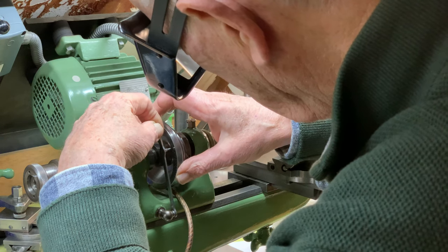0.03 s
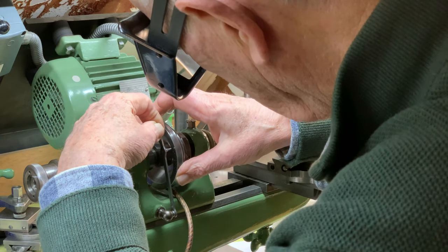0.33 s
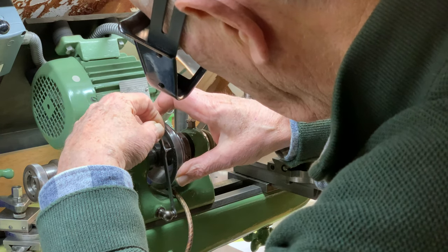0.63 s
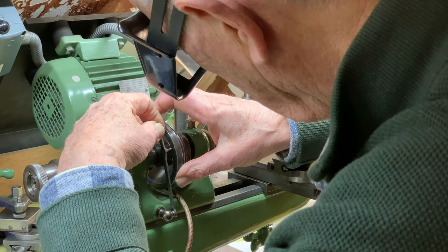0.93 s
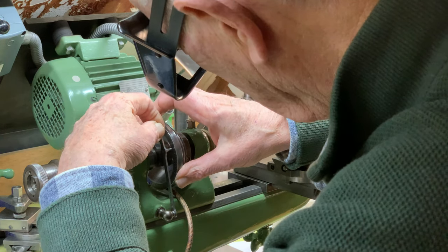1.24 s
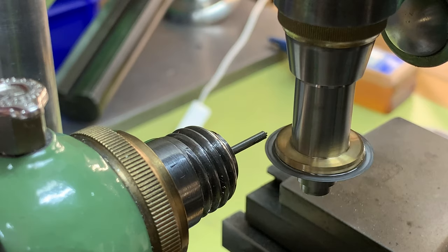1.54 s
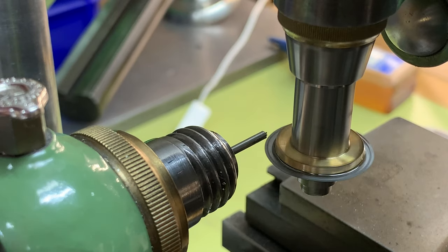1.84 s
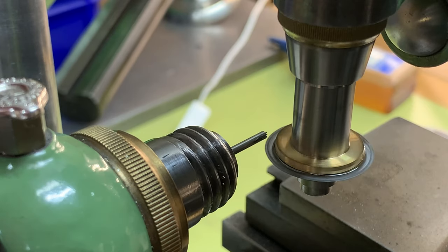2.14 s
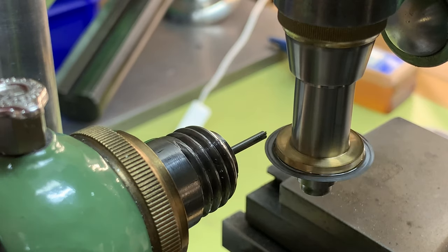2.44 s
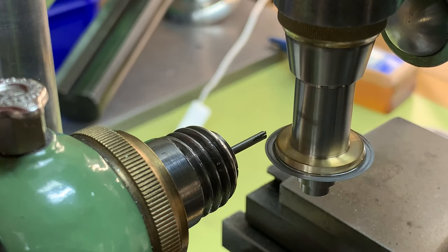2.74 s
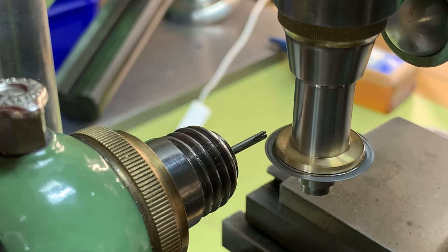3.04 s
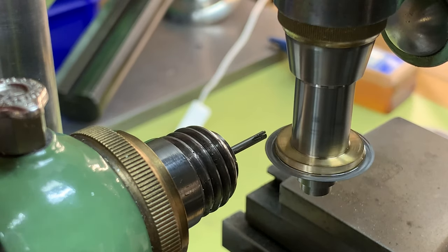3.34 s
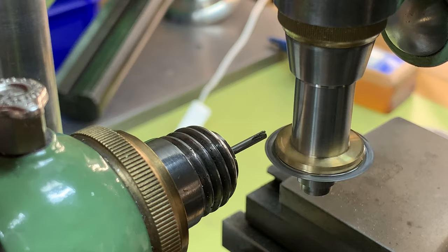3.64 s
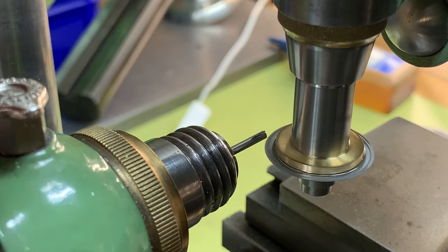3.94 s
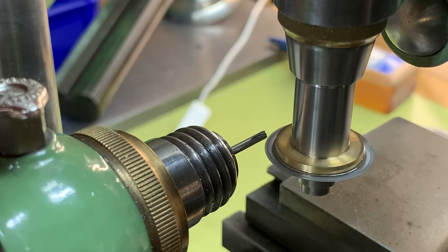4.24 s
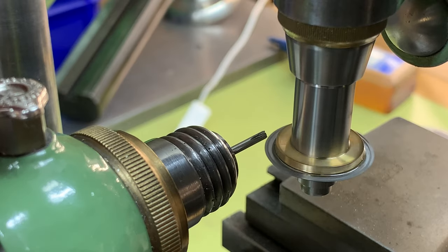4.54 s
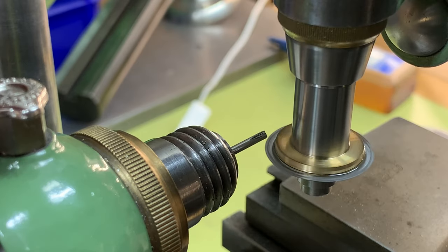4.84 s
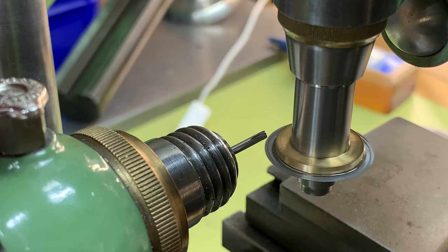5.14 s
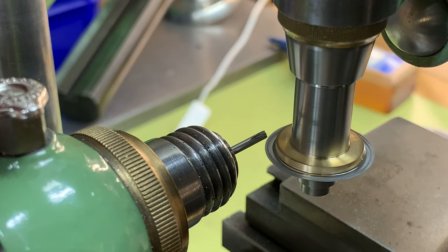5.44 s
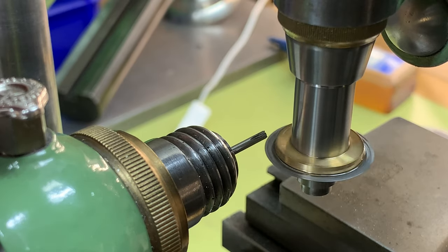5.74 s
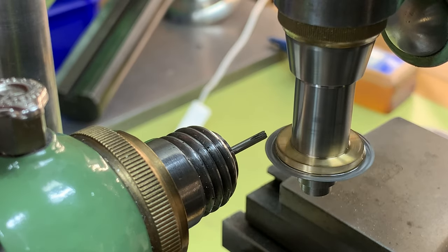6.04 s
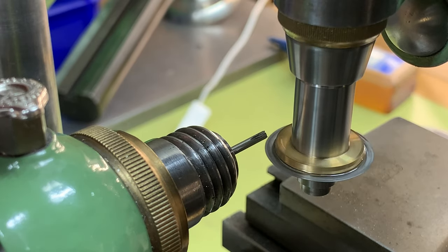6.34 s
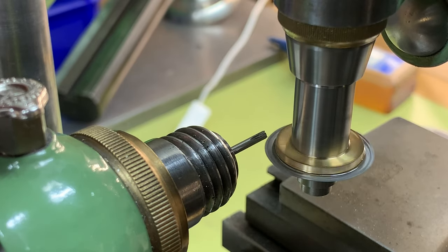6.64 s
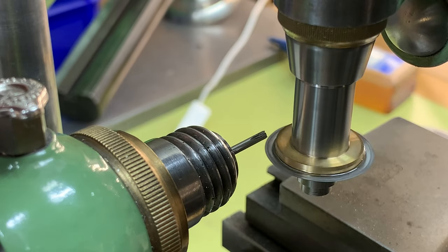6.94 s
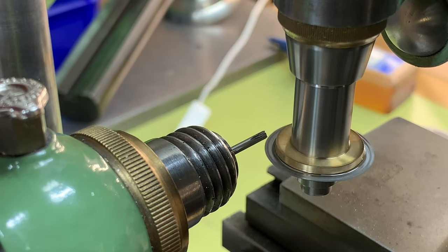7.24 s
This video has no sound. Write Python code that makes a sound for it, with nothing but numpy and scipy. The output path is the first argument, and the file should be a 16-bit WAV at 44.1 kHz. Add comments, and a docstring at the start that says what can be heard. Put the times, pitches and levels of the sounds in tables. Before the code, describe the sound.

A small lathe is already running at the start, close by on a workshop bench with only very short reflections. Bright steel double clacks repeat about ten times a second, with a fast ticking rattle and a few stray clacks between them. A high metallic ringing swells at nearly the same rate. Underneath are a steady motor hum, the drone of the frame, a smooth bearing hiss and soft belt thumps. For the first 1.2 seconds the sound is louder and fuller in the middle range. It then drops out for a split second and returns at about 1.3 seconds, quieter and thinner, with the same rhythm and a faint high whine. Slight brushing scrapes blend into the rattle at around 3.2, 5.3 and 5.7 seconds. The machine keeps its even pace to the end at about 7.5 seconds.

```python
"""Bright steel clacks and a fast ticking rattle from a small lathe running on a workshop bench, close by. Its
drive turns ten times a second: loose parts tick at fixed places round the turn and clack twice at its tight
spot, with stray clacks between. The spindle sings in swells, the belt thumps, the frame drones and the motor
hums. The scene changes from beside the headstock to the cutter, with a brief near-silence between."""
import sys
import numpy as np
from scipy import signal
from scipy.fft import rfft, irfft
from scipy.io import wavfile

SR = 44100
rng = np.random.default_rng(int(sys.argv[2]) if len(sys.argv) > 2 else 0)


def to_wav(sig):
    """Store sig (one row per channel, or 1-D mono) as 16-bit WAV at the path in sys.argv[1].

    Samples outside -1..1 are clipped; the rate is SR.
    """
    pcm = np.clip(np.atleast_2d(sig), -1, 1) * 32767
    pcm = np.round(pcm).astype(np.int16)
    wavfile.write(sys.argv[1], SR, pcm.T)  # frames by channels


N = 329868
TIME, HZ = np.arange(N) / SR, np.fft.rfftfreq(N, 1 / SR)
TURN_HZ = 10.0066
CHANGE_S = 1.27  # the scene changes to the cutter

# one row per turn: (time [s], first blow [dB], second blow [dB], its chink [dB], belt thump [dB])
CLACKS = [(0.011, -34, -26, -38.0, -68.0), (0.11, -23, -32, -39.0, -61.0), (0.2054, -29.5, -33.0, -31, -53),
          (0.311, -27, -32, -32, -37.5), (0.4097, -29, -33.0, -35.0, -38.5), (0.51, -24.5, -30, -35, -42),
          (0.6098, -25.5, -29, -33.5, -42), (0.7126, -27, -25, -39, -65.0),
          (0.8111, -22.5, -29, -35, -60.0), (0.909, -23.0, -23.5, -30, -43.5),
          (1.006, -29, -28.0, -32, -47.0), (1.1125, -26, -25, -30.0, -52.0),
          (1.21, -22.5, -32, -34.5, -65.0), (1.3472, -22.5, -31, -28, -60),
          (1.4503, -26.5, -30, -31.0, -35.5), (1.549, -28, -39, -26.5, -54),
          (1.6483, -28.5, -39.0, -28.5, -40.5), (1.7504, -22.5, -31, -28.5, -44),
          (1.8494, -25.5, -35, -29, -51), (1.951, -28, -28, -28.5, -46), (2.0483, -30, -35.0, -28, -64),
          (2.148, -31.0, -34.0, -36, -50), (2.25, -26, -34.0, -26.5, -43), (2.349, -24.0, -32.0, -32, -62),
          (2.448, -26, -42, -30, -64.0), (2.5505, -25.0, -41, -34, -47), (2.651, -28, -33, -43.5, -41),
          (2.749, -25.5, -28, -35.5, -43), (2.849, -23.5, -31, -28, -44.0),
          (2.946, -30.0, -27.5, -31.5, -42), (3.0485, -24.5, -32, -33, -39.5),
          (3.147, -26, -25, -30.5, -48.0), (3.2445, -48, -28, -30.5, -45),
          (3.346, -23.5, -29.0, -30, -54.0), (3.447, -26, -31, -29.5, -38.0),
          (3.5472, -22.5, -37, -35, -59), (3.645, -34.0, -41, -31, -57.0), (3.745, -21.5, -30, -39.0, -67),
          (3.8442, -26, -32, -31, -58), (3.9464, -27, -37, -32, -38), (4.046, -27, -29.0, -27.5, -57),
          (4.1442, -32.0, -26, -30, -39), (4.2483, -22.0, -32.0, -31, -47),
          (4.3478, -23.5, -34.0, -28.5, -53), (4.4482, -25.5, -30, -35.0, -59),
          (4.5487, -26.5, -36, -39, -67), (4.648, -31, -32, -45, -62), (4.7483, -25.0, -28, -29.5, -42),
          (4.8468, -22, -33, -29.5, -66.0), (4.948, -24, -40, -32, -63), (5.0484, -22.5, -28, -38, -53),
          (5.148, -24.5, -29.0, -33.0, -39), (5.246, -23, -28.0, -38.0, -43),
          (5.3469, -23.0, -34, -27, -44), (5.4473, -24.5, -26.5, -37, -47), (5.548, -26.0, -29, -36, -41.0),
          (5.648, -23.5, -26, -37, -50), (5.746, -38.0, -28.5, -30.5, -45), (5.844, -21, -32, -32, -37.5),
          (5.948, -26.5, -42.0, -40, -44), (6.0459, -22.5, -34, -34, -60), (6.1432, -35, -26, -39.5, -43),
          (6.2454, -23, -32, -38, -51), (6.3478, -22.5, -30, -28.5, -44), (6.445, -21.5, -41.0, -31, -41.0),
          (6.5465, -27, -31, -31, -45.0), (6.6457, -31, -32, -32.5, -38.0), (6.746, -22.0, -27, -33.5, -41),
          (6.847, -23, -42.0, -33, -45), (6.947, -25.0, -37, -38, -53.0), (7.048, -26.5, -29, -36, -56),
          (7.1463, -29.5, -35.0, -42, -50.0), (7.247, -26.5, -25.0, -32, -39.0),
          (7.3456, -21.5, -37.5, -37.0, -62), (7.4454, -39.0, -29, -32, -42.5)]
# where the loose parts touch: (place [turns], singing tick [dB], bright snap [dB], deep ring [dB])
TICKS = [(0.036, -44.0, -31.5, -38.0), (0.134, -36.5, -33.5, -39.0), (0.166, -36.0, -33.0, -39.0),
         (0.207, -35.0, -33.5, -40.5), (0.246, -37.0, -37.0, -43.5), (0.292, -37.5, -38.5, -47.0),
         (0.321, -41.5, -41.5, -49.5), (0.415, -38.5, -43.0, -49.0), (0.491, -36.0, -37.5, -45.0),
         (0.53, -36.0, -42.0, -47.0), (0.574, -38.5, -44.0, -51.5), (0.613, -33.5, -44.5, -48.5),
         (0.652, -37.0, -41.5, -47.5), (0.698, -34.5, -37.5, -44.5), (0.738, -36.0, -38.5, -45.0),
         (0.78, -36.0, -39.5, -44.0), (0.824, -35.5, -36.0, -42.5), (0.87, -38.0, -34.5, -45.5),
         (0.911, -39.5, -33.0, -43.5), (0.956, -39.5, -30.0, -40.0)]
# how hard the steel parts run against each other: (time [s], level [dB])
EFFORT = [(0, 0), (.7, 0.5), (1.2, 1), (1.4, 2), (2, 1.4), (3.2, -0.5), (4, 1), (4.9, 1), (5.4, 0.5),
          (6.2, 1), (7.48, 1)]
# the bright snap and the deep ring of a steel contact: (frequency [Hz], level [dB])
CLACK_BRIGHT = [(3300, -19.5), (4000, -11.5), (4900, -11.5), (5600, -8), (6900, -7), (8000, -0.5),
                (8800, 3), (10000, -4.5), (11200, -8), (12400, -16), (15800, -17.5)]
CLACK_DEEP = [(300, -37), (800, -33), (1400, -9), (2000, -7.5), (2300, -3.5), (2600, 1.5), (3050, -1.5),
              (3350, -3), (4300, -20.5), (5500, -34.5)]
# resonances of steel and frame, hollows where negative: (frequency [Hz], width [Hz], lift [dB])
STEEL_MODES = [(1950, 250, 2), (2270, 90, -3), (2450, 90, 5.5), (2560, 70, -4.5), (2700, 60, 6.5),
               (2850, 50, 3), (2930, 50, -4), (3000, 60, 6), (3070, 70, 6), (3390, 140, -4.5),
               (3720, 130, 3), (3870, 80, -3), (4020, 200, 2.5), (4370, 120, 3), (4750, 500, -2.5),
               (5280, 130, 3), (5645, 60, 3.5), (5745, 60, 4), (5960, 120, 2), (6280, 100, 2),
               (6500, 50, 5), (6570, 40, 4.5), (6700, 70, -2), (6950, 70, 2.5), (7220, 130, 5),
               (7460, 200, 5.5), (7680, 140, -4), (8040, 400, 3.5), (8760, 190, 3.5), (9030, 130, -3),
               (9180, 130, 3.5), (9930, 150, 5), (10500, 250, 2), (11230, 150, 2), (12750, 200, 4)]
FRAME_MODES = [(203, 18, 7), (268, 22, -4), (361, 25, 4), (432, 30, 5), (495, 25, 4), (566, 22, -6),
               (588, 12, -4), (633, 8, -3), (603, 14, 2), (621, 16, 10), (645, 16, 9), (661, 12, 3),
               (678, 12, 6), (695, 16, -4), (735, 20, 4), (760, 26, -7), (798, 12, 4), (822, 22, 5),
               (850, 20, -3), (910, 40, 2), (955, 20, -3), (996, 22, 5), (1038, 30, -6), (1095, 14, 4),
               (1125, 35, 4), (1162, 25, 5), (1220, 70, -4), (1400, 40, 2), (1610, 50, 2)]
# stereo image: (frequency [Hz], likeness [0-1], lag of the left [ms], left minus right [dB])
STEREO = [(30, 0.54, 0, -4), (99, 0.93, -0.027, -1.5), (199, 0.88, -0.11, 0), (457, 0.95, -0.25, -1),
          (700, 0.8, -0.28, 1.5), (1275, 0.52, -0.1, 1), (2480, 0.18, .28, -0.5), (2990, 0.84, 0.23, -2),
          (4400, 0.8, 0.27, 1), (5640, 0.9, 0.22, -6), (5680, 0.76, 0.19, -5), (7450, 0.47, 0.17, 1),
          (8050, 0.98, 0.283, -2), (10300, 0.93, 0.2978, 0.5), (15000, 1, 0.2984, 0)]


def clacks(second_times, bright_db=1.5, deep_db=1.5, after_db=-13):
    """Hard steel contacts: a bright snap, a deeper ring, and a faint after-ring of the spindle."""
    # what sings on after a clack: (frequency [Hz], level [dB])
    after_ring = [(2000, -22), (2900, -19), (3400, -10), (5000, -29.5), (5650, -11), (6800, -33),
                  (7400, -3), (8050, -11), (8800, 0.5), (10000, -4.5), (12000, -23)]
    times, snap_levels, deep_levels = contacts(second_times)
    blows = strikes(times, gain_of(snap_levels) ** 2)
    snap = die_away(blows, rise_s=0.0004, decay_s=0.0019)
    deep = die_away(strikes(times, gain_of(deep_levels) ** 2), rise_s=0.00036, decay_s=0.002)
    after = die_away(blows, rise_s=0.0016, decay_s=0.0089)
    return (gain_of(bright_db) * ring(snap, CLACK_BRIGHT, STEEL_MODES)
            + gain_of(deep_db) * ring(deep, CLACK_DEEP, STEEL_MODES)
            + gain_of(after_db) * ring(after, after_ring, STEEL_MODES))


def contacts(second_times, first_ring_db=-10, second_ring_db=-9):
    """Times, snap levels and deep-ring levels of all clacks: a double blow each turn, and the strays."""
    times, first, second, chink, _ = np.transpose(CLACKS)
    first_blows = [times, first, first + first_ring_db]
    second_blows = [second_times, second, chink + second_ring_db]
    return np.hstack([first_blows, second_blows, stray_clacks()])


def stray_clacks(cycle_s=25 / TURN_HZ):
    """Clacks outside the double blow; those heard at the cutter come back every cycle."""
    # first appearances: (time [s], snap [dB], deep ring [dB])
    strays = [(.1639, -29.5, -32.5), (.2224, -26.5, -47), (.58, -33, -43), (.655, -27.5, -33),
              (.9976, -32, -36), (2.7989, -27, -34), (2.8034, -36, -55), (2.8645, -26.5, -46),
              (3.2199, -31, -52), (3.291, -28, -44), (3.429, -28, -33.5), (3.6365, -49, -36),
              (3.6402, -30, -39), (3.6446, -47, -50)]
    return np.transpose([(at, *levels) for start, *levels in strays
                         for at in np.arange(start, CHANGE_S if start < CHANGE_S else N / SR, cycle_s)])


def chinks(second_times, level_db=20.5):
    """The second blow of each turn lands cleanly and rings the same metallic chink."""
    # one clean strike on steel: (frequency [Hz], level [dB])
    spectrum = [(1200, -22), (2100, -16), (2500, -1), (3000, 4.5), (3400, -9.5), (4600, -15), (5500, -15),
                (7200, -25), (8000, -16), (8600, -3), (9200, -10), (10500, -11), (12000, -27), (15800, -32)]
    force = rfft(strikes(second_times, gain_of(np.transpose(CLACKS)[3] + level_db)))
    return body(force, force, spectrum, STEEL_MODES)


def rattle(sing_db=1.0, snap_db=-3.0, deep_db=-1, uneven_db=2.1, scatter_s=0.00049):
    """The loose parts touch at the same places on every turn, never twice with quite the same force."""
    # the singing part of a tick: (frequency [Hz], level [dB])
    sing_spectrum = [(1500, -33), (3050, -4.5), (3350, -27), (4950, -15.5), (5500, -7.5), (6900, -2.5),
                     (8050, 5.5), (8800, 1.5), (10000, -13.5), (11200, -40), (15800, -29)]
    # how strongly the ticks wake the deep ring: (time [s], level [dB])
    deep_ring = [(0, 3), (1.25, 1), (1.35, 1), (2.4, 2), (3.5, 1.5), (5, -1), (7.48, -1)]
    ticks = [(at, *levels) for place, *levels in TICKS for at in touches(place)]
    times, sing, snap, deep = np.transpose(ticks)
    late, force = np.clip(rng.standard_normal((len(times), 2)), -2, 2).T
    effort_db = np.interp(times, *np.transpose(EFFORT)) + uneven_db * force
    layers = [(sing + sing_db, sing_spectrum), (snap + snap_db, CLACK_BRIGHT),
              (deep + deep_db + np.interp(times, *np.transpose(deep_ring)), CLACK_DEEP)]
    sound = np.zeros((2, N))
    for levels, spectrum in layers:
        blows = strikes(times + scatter_s * late, gain_of(levels + effort_db) ** 2)
        sound += ring(die_away(blows, rise_s=0.00077, decay_s=0.00096), spectrum, STEEL_MODES)
    return sound


def spindle(steel, spin_hz=9.606, swing_db=5, mean_db=-1):
    """The spindle turns a little slower than the drive and swells the steel's high singing once a turn."""
    # how much of the steel follows the spindle: (frequency [Hz], share [0-1])
    singing = [(7000, 0), (7400, .4), (7650, .5), (7850, 1), (8200, 1), (8500, .4), (9250, .35), (9700, 0)]
    peak_s = np.where(TIME < CHANGE_S, .0084, .0575)
    angle = 2 * np.pi * spin_hz * (TIME - peak_s)
    swell = gain_of(mean_db + swing_db * np.cos(angle))
    return steel + irfft(rfft(steel) * by_frequency(singing), N) * (swell - 1)


def belt(level_db=-1, delay_s=0.0021):
    """Once a turn the belt flaps and sets off a short, soft boom."""
    levels = np.transpose(CLACKS)[4] + level_db
    return booms(tight_spots() + delay_s, levels, hz=203.1, swell_s=0.025, detune=0.026)


def frame(level_db=-44.0, flutter_db=2.0):
    """The cast frame and bench drone, shaken harder at the tight spot."""
    # the drone: (frequency [Hz], level [dB])
    spectrum = [(20, -23), (45, -9), (72, -2), (88, -5.5), (120, -6.5), (160, -2), (270, -2.5), (430, -0.5),
                (570, -2), (680, 1), (760, -2.5), (1100, -6.5), (1280, -10), (2000, -6.5), (4000, -28.5)]
    return ring(gain_of(level_db + load_db() + flutter_db * drift(39)), spectrum, FRAME_MODES)


def knock(level_db=-51, uneven_db=2):
    """The tight spot knocks the main resonance of the frame."""
    times = tight_spots()
    levels = level_db + uneven_db * rng.standard_normal(len(times))
    return booms(times, levels, hz=630, swell_s=0.01, detune=0.029)


def bearings(level_db=-44.5, load_share=0.31):
    """The running bearings rub smoothly, louder under load."""
    # the rub: (frequency [Hz], level [dB])
    spectrum = [(1000, -26.5), (2000, -3), (3050, -6), (3400, -5.5), (5000, -5.5), (5400, 1.5),
                (7000, -4.5), (8100, 4), (9000, 1), (10200, -29), (11300, -21), (15800, -27)]
    envelope = gain_of(level_db + by_time(EFFORT) + load_share * load_db() + drift(39))
    return ring(envelope, spectrum, STEEL_MODES)


def scrapes():
    """Now and then something brushes the turning work."""
    # short brushes: (time [s], level [dB])
    brushes = [(0.789, -45), (3.218, -38), (5.3, -37.5), (5.715, -37.5)]
    # their dull tone: (frequency [Hz], level [dB])
    spectrum = [(700, -10), (1300, -13), (1600, -2), (2050, 8), (2400, 0), (3000, -20), (4000, -30)]
    times, levels = np.transpose(brushes)
    envelope = die_away(strikes(times, gain_of(levels) ** 2), rise_s=0.0022, decay_s=0.0081)
    return ring(envelope, spectrum, STEEL_MODES)


def motor(mains_hum_hz=100, waver_db=2, wobble_rad=.25):
    """The motor hums on steady tones, each wavering a little."""
    # shaft orders, mains hum and faint bearing tones: (frequency [Hz], level [dB])
    tones = [(24.9, -75), (100, -55), (149.5, -57.5), (200, -54.5), (299, -65), (431, -61.5), (498.3, -66),
             (548, -62), (573, -69), (597.8, -64), (622.7, -57), (644, -62), (818, -65.5), (996, -69)]
    # swell of the mains hum: (time [s], level [dB])
    mains_swell = [(0, 2), (.7, 1), (2, 1.5), (2.7, 0.5), (3.5, 3), (4.7, 1.5), (5.3, 3.5), (6.2, -0.5),
                   (7.48, -4.5)]
    hum = np.zeros(N)
    for hz, db in tones:
        level = gain_of(db + waver_db * drift(10.4) + by_time(mains_swell) * (hz == mains_hum_hz))
        hum += level * np.sin(2 * np.pi * (hz * TIME + rng.random()) + wobble_rad * drift(3.8))
    return np.sqrt(2) * hum * gain_of([[-1], [1]])  # leans to the right


def casing(level_db=-53, uneven_db=3):
    """Close to the headstock the ticks also rattle its casing."""
    # the casing's tone: (frequency [Hz], level [dB])
    spectrum = [(400, -25), (700, 5), (1000, -4), (1500, 2), (1900, -8), (2600, -29)]
    times = np.concatenate([touches(place) for place, *_ in TICKS])
    levels = level_db + uneven_db * np.clip(rng.standard_normal(len(times)), -2, 2)
    force = gain_of(levels) * (times < CHANGE_S)
    envelope = die_away(strikes(times, force ** 2), rise_s=0.00036, decay_s=0.001)
    return ring(envelope, spectrum, FRAME_MODES)


def whine(level_db=-56):
    """The bearings sing faintly on two narrow, unsteady notes, heard at the cutter."""
    # the two notes: (frequency [Hz], width [Hz], lift [dB])
    notes = [(5680, 150, 31), (6510, 140, 27)]
    # the band they stay in: (frequency [Hz], level [dB])
    band = [(4500, -40), (5500, 1), (6700, 1), (7500, -40)]
    return ring(gain_of(level_db) * (TIME > CHANGE_S), band, notes)


def workshop(direct, t60_s=.12, wet_db=-11, echoes_per_s=3000):
    """Adds dense reflections from the bench and nearby walls, different left and right."""
    # what the surroundings throw back: (frequency [Hz], level [dB])
    walls = [(300, 0), (1500, -12), (4000, 6.5), (8000, 1), (12000, -25)]
    t = TIME[:SR // 3]
    taps = rng.choice([-1, 1], (2, len(t))) * (rng.random((2, len(t))) < echoes_per_s / SR)
    taps = taps * (t > .003) * gain_of(-60 * t / t60_s)  # 3 ms of pre-delay
    taps /= np.linalg.norm(taps, axis=1, keepdims=True)
    tail = signal.fftconvolve(direct, taps, axes=1)[:, :N]
    return direct + gain_of(wet_db) * irfft(rfft(tail) * gain_of(by_frequency(walls)), N)


def turns(times):
    """How far the drive has turned; whole numbers fall on its tight spot."""
    tight_spot_s = np.where(times < CHANGE_S, .0108, 1.3502)
    return (times - tight_spot_s) * TURN_HZ


def tight_spots():
    """When the tight spot comes round, once for each double clack."""
    times = np.transpose(CLACKS)[0]
    return times - (turns(times) - np.round(turns(times))) / TURN_HZ


def touches(place):
    """When one place on the turn comes round."""
    return TIME[np.flatnonzero(np.diff(np.floor(turns(TIME) - place)) == 1)]


def load_db():
    """The load on the frame, repeated every turn."""
    # load round one turn: (place [turns], level [dB])
    load = [(0, 5), (.04, 5), (.12, 5.5), (.22, 3.5), (.31, 3), (.38, 3), (.5, 2.5), (.7, 3), (.88, 1.5),
            (.96, 3.5)]
    return np.interp(turns(TIME), *np.transpose(load), period=1)


def ring(envelope, spectrum, modes):
    """Contact noise under an envelope drives a body, partly alike left and right."""
    left, other = rfft(envelope * rng.standard_normal((2, N)))
    likeness = np.clip(by_frequency(STEREO), 0, 1)
    right = likeness * left + np.sqrt(1 - likeness ** 2) * other
    return body(left, right, spectrum, modes)


def body(left, right, spectrum, modes):
    """Left and right force spectra sound a body's resonances, placed in the stereo image."""
    lean = gain_of(by_frequency(STEREO, column=3) / 2)
    lag = np.exp(2j * np.pi * HZ * by_frequency(STEREO, column=2) / 1000)
    colour = unit_rms(gain_of(by_frequency(spectrum) + resonances(modes)))
    # minimum phase: the body rings after a blow, never before it
    log_colour = np.log(np.r_[colour, colour[-2:0:-1]])
    response = np.exp(np.conj(signal.hilbert(log_colour)))[:len(HZ)]
    return irfft(np.array([left * lean, right * lag / lean]) * response, N)


def booms(times, levels, hz, swell_s, detune):
    """Short, soft swells of one low resonance, each slightly off pitch."""
    t, sound = TIME[:SR // 6], np.zeros(N)
    shape = np.sqrt(2) * (t / swell_s) ** 2 * np.exp(2 * (1 - t / swell_s))
    for at, db, (offset, phase) in zip(times, levels, rng.random((len(times), 2))):
        pitch_hz = hz * (1 + detune * (offset - .5))
        boom = gain_of(db) * shape * np.sin(2 * np.pi * (pitch_hz * t + phase))
        part = sound[round(at * SR):][:len(t)]
        part += boom[:len(part)]
    return sound


def strikes(times, sizes):
    """A train of impulses."""
    train = np.zeros(N)
    np.add.at(train, np.clip(np.round(times * SR).astype(int), 0, N - 1), sizes)
    return train


def die_away(power, rise_s, decay_s):
    """Amplitude envelope of blows whose power swells and dies fast."""
    t = TIME[:SR // 20]
    shape = (1 - np.exp(-t / rise_s)) * np.exp(-t / decay_s)
    return np.sqrt(abs(signal.oaconvolve(power, shape / shape.max())[:N]))


def resonances(modes):
    """Lift in dB of a set of resonances, by frequency."""
    return sum(db / (1 + (2 * (HZ - hz) / width) ** 2) for hz, width, db in modes)


def drift(rate_hz):
    """A smooth random wander of rms 1."""
    return unit_rms(irfft(rfft(rng.standard_normal(N)) * np.exp(-(HZ / rate_hz) ** 2), N))


def by_frequency(rows, column=1):
    """One column of a table as a curve over log frequency."""
    table = np.transpose(rows)
    return np.interp(np.log(HZ + 1), np.log(table[0] + 1), table[column])


def by_time(rows):
    """A table as a curve over time."""
    return np.interp(TIME, *np.transpose(rows))


def gain_of(db):
    """Decibels to amplitude."""
    return 10 ** (np.asarray(db) / 20)


def unit_rms(x):
    """Scaled to rms 1."""
    return x / np.sqrt(np.mean(x ** 2) + 1e-20)


def scene(second_blow_s=0.0089, scatter_s=0.00025):
    """The whole machine, heard first beside the headstock, then at the cutter."""
    # tone colour beside the headstock: (frequency [Hz], lift [dB])
    headstock = [(60, 7.5), (150, 7), (205, 3), (260, 6), (450, 3.5), (530, 6), (620, 6.5), (760, 7),
                 (1000, 8.5), (1500, 9), (2400, 7), (3000, 4), (4000, 7.5), (8000, 6.5)]
    # resonances and hollows there: (frequency [Hz], width [Hz], lift [dB])
    headstock_modes = [(320, 120, -1.5), (485, 45, -5), (540, 35, 5), (635, 40, 1.5), (672, 25, 3),
                       (718, 28, 6), (865, 22, 7), (918, 24, 4), (990, 30, -3), (1055, 34, 10),
                       (1115, 50, -4), (1160, 22, 2), (1200, 40, -3), (1455, 30, 6), (1535, 40, 2),
                       (1735, 70, -5), (1815, 30, -5), (1915, 40, 3)]
    second_times = tight_spots() + second_blow_s + scatter_s * rng.standard_normal(len(CLACKS))
    hits = clacks(second_times) + chinks(second_times) + rattle() + scrapes()
    steel = workshop(hits) + bearings() + whine()
    machine = spindle(steel) + casing() + frame() + knock() + belt() + motor()
    colour = gain_of(by_frequency(headstock) + resonances(headstock_modes))
    return np.where(TIME < CHANGE_S, irfft(rfft(machine) * colour, N), machine)


def record(dry, cutoff_hz=15900):
    """The sound nearly stops briefly as the scene changes, and a low-pass trims the top treble."""
    # the brief gap between the scenes: (time [s], level [dB])
    dropout = [(1.228, -8), (1.236, -16.5), (1.244, -47), (1.295, -46), (1.3, -9), (1.308, -3)]
    low_pass = signal.firwin(511, cutoff_hz, window=("kaiser", 9), fs=SR)
    return signal.oaconvolve(dry * gain_of(by_time(dropout)), low_pass[None], "same")


dry = scene()
out = record(dry)
to_wav(out)
```